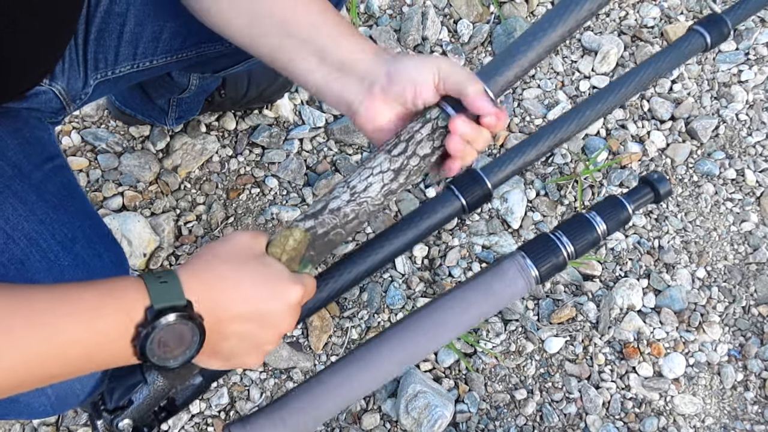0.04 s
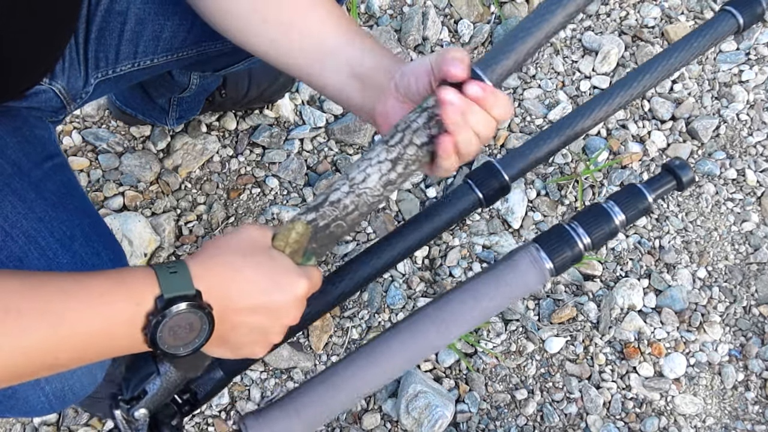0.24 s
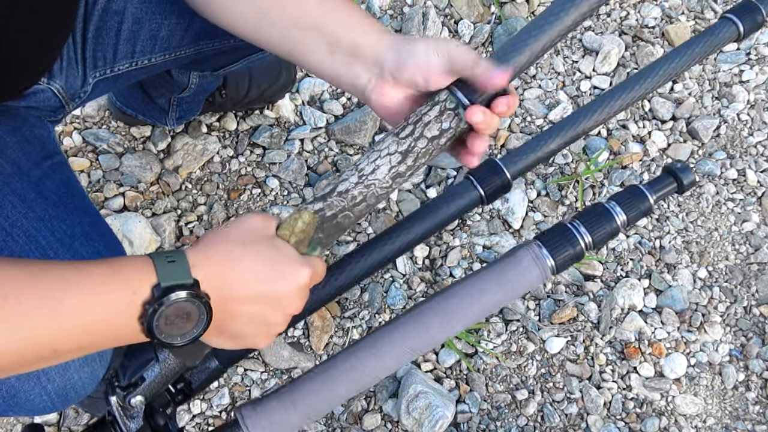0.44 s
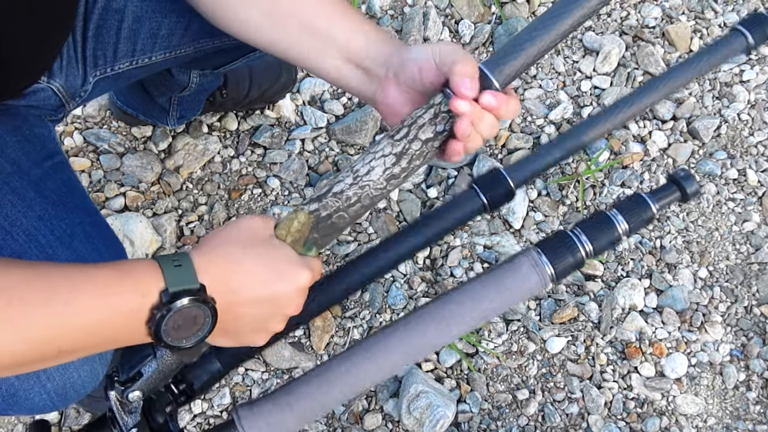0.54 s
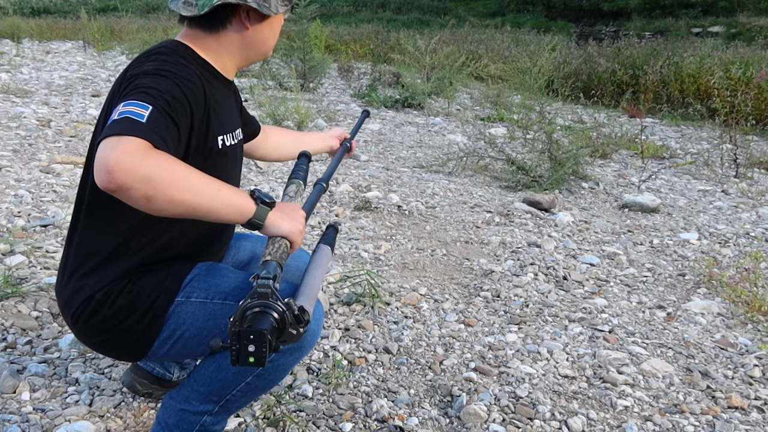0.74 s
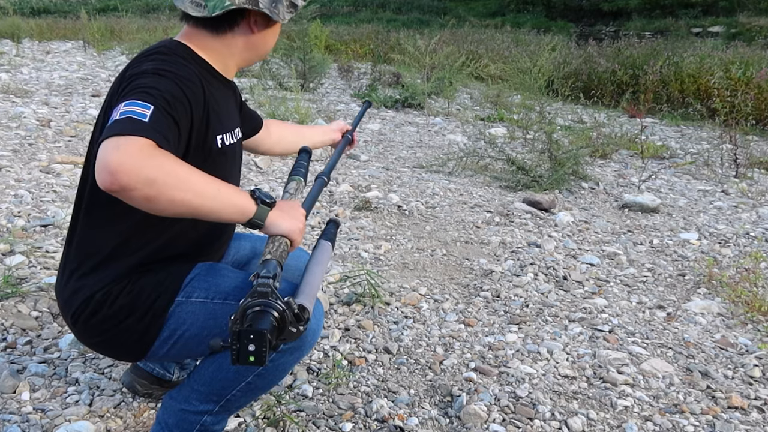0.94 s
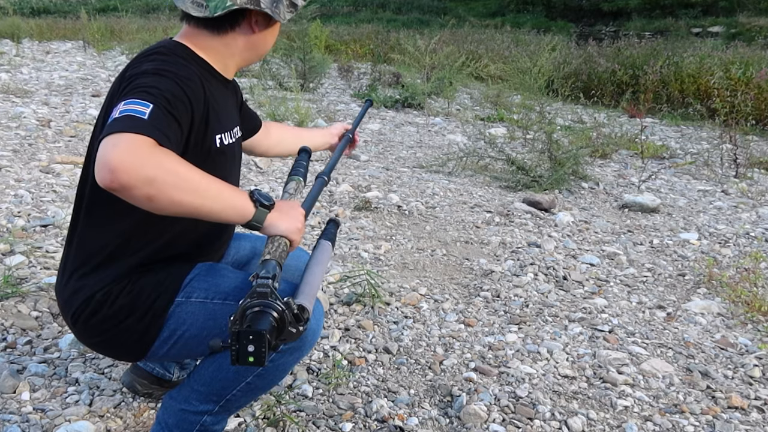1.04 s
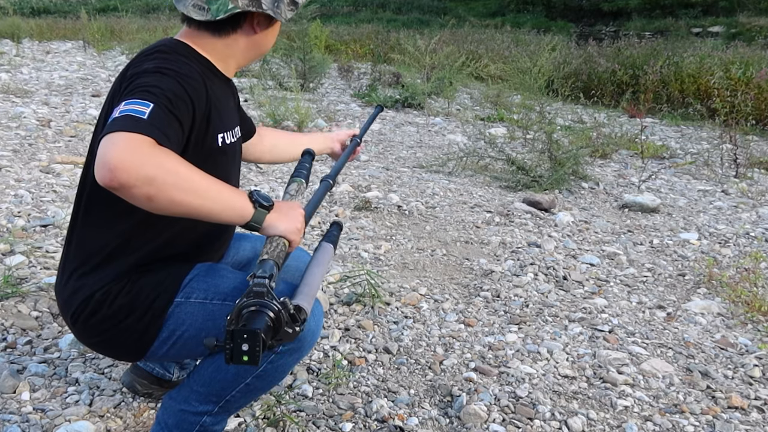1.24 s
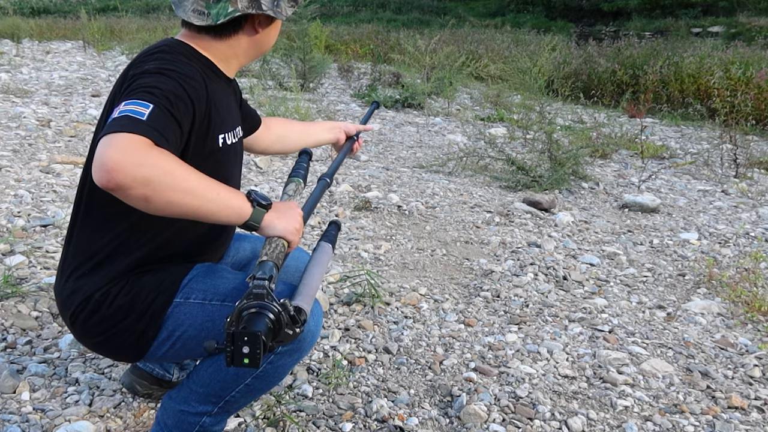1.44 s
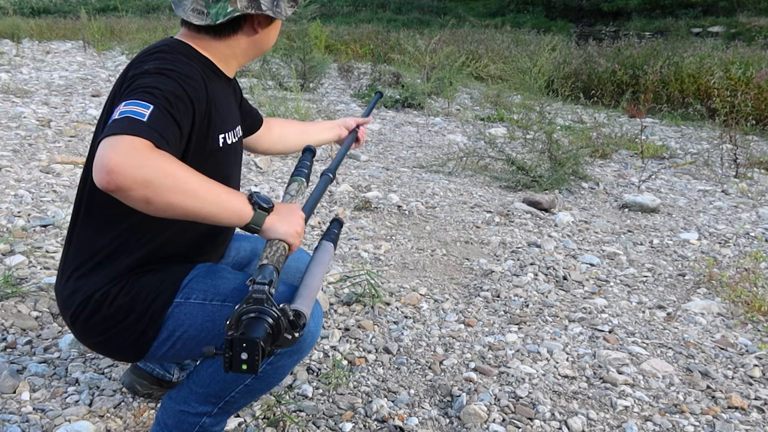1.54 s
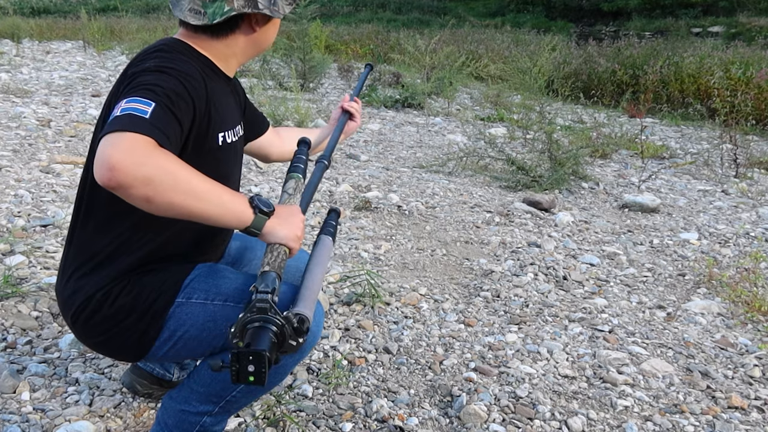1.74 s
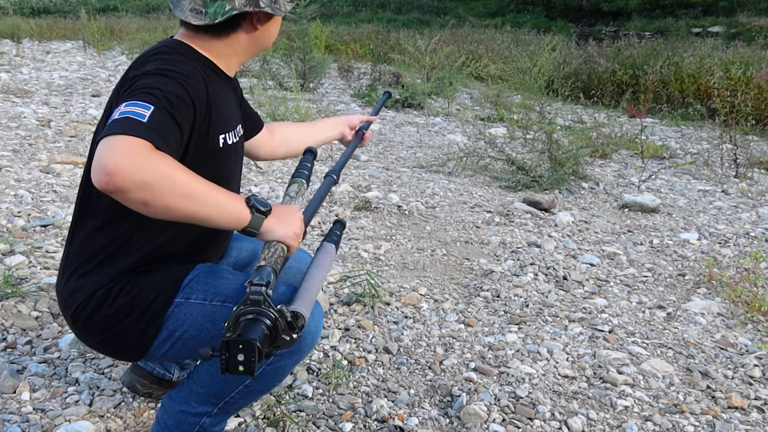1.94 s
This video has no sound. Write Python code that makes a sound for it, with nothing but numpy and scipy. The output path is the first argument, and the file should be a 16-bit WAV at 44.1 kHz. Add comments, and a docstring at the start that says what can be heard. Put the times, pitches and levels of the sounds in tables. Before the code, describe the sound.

A tripod leg slides out with a brief scrape and snaps sharply against its stop. Faint ticks, soft knocks and hand rubs follow, slightly to the left, over a quiet outdoor hush with thin insect song.

```python
"""A faint outdoor hush and thin bands of insect song lie over a stony riverbank throughout.
First a tripod's leg section slides out, friction in its collar making a growing scrape. It catches,
then snaps against its stop: the impact excites the tube's modes, and the sound scatters off the stones.
Afterwards come a few soft knocks and the rub of hands along the legs.
Small ticks from the fittings begin during the slide and recur until the end."""
import sys
import numpy as np
from scipy import signal
from scipy.fft import rfft, irfft
from scipy.io import wavfile

SR = 44100
rng = np.random.default_rng(int(sys.argv[2]) if len(sys.argv) > 2 else 0)


def to_wav(sig):
    """Store sig (one row per channel, or 1-D mono) as 16-bit WAV at the path in sys.argv[1].

    Samples outside -1..1 are clipped; the rate is SR.
    """
    pcm = np.clip(np.atleast_2d(sig), -1, 1) * 32767
    pcm = np.round(pcm).astype(np.int16)
    wavfile.write(sys.argv[1], SR, pcm.T)  # frames by channels


N = 88200
T = np.arange(N) / SR
# steep low cuts keep the snap and handling sounds thin, with little bass
LEG_LOW_CUT_HZ, HANDLING_LOW_CUT_HZ = 695, 380


def from_db(db):
    """Amplitude ratio of a level in decibels."""
    return 10 ** (np.asarray(db) / 20)


def unit_rms(x):
    """Normalisation to an rms of 1."""
    return x / np.sqrt(np.mean(x ** 2) + 1e-20)


def pan(db):
    """Interchannel level difference: two gains, the left louder by db."""
    gains = from_db(np.array([[db], [-db]]) / 2)
    return gains / gains.mean()


def low_pass(x, hz):
    """Second-order low-pass: a gentle loss of treble."""
    return signal.sosfilt(signal.butter(2, min(hz, SR / 2 - 1000), fs=SR, output="sos"), x + 1e-18)


def high_pass(x, hz):
    """Fourth-order high-pass: a steep loss of bass."""
    return signal.sosfilt(signal.butter(4, hz, "high", fs=SR, output="sos"), x + 1e-18)


def noise(spectrum, correlation):
    """Spectrally shaped stereo noise of rms 1; the mid-side balance sets the left-right correlation."""
    hz, db = np.transpose(spectrum)
    freqs = np.maximum(np.fft.rfftfreq(N, 1 / SR), 1)
    gains = from_db(np.interp(np.log(freqs), np.log(hz), db))
    mid, side = irfft(rfft(rng.standard_normal((2, N))) * gains, N)
    return unit_rms(np.sqrt(1 + correlation) * mid + np.sqrt(1 - correlation) * side * [[1], [-1]])


def narrowband(centre_hz, width_hz):
    """Quadrature modulation: slow noise shifted to a centre frequency that may move; rms 1."""
    in_phase, quadrature = low_pass(rng.standard_normal((2, N)), width_hz / 2)
    phase = 2 * np.pi * np.cumsum(centre_hz * np.ones(N)) / SR
    return unit_rms(in_phase * np.cos(phase) + quadrature * np.sin(phase))


def drift(rate_hz):
    """Random modulation of rms 1, interpolated between independent values."""
    knots = rng.standard_normal(N)
    return unit_rms(np.interp(T * rate_hz, np.arange(N), knots))


def swell(peak_s, half_length_s, level_db):
    """Bell-shaped amplitude envelope of a stroke."""
    return from_db(level_db) / (1 + ((T - peak_s) / half_length_s) ** 2 / 2) ** 2


def decay(start_s, t60_s):
    """Exponential damping: silence, then a fall from 1 by 60 dB every t60_s."""
    return (T >= start_s) * from_db(-60 * np.clip((T - start_s) / t60_s, 0, 5))


def ring(start_s, pitch_hz, t60_s):
    """Free vibration of one struck mode: a damped sinusoid."""
    return decay(start_s, t60_s) * np.sin(2 * np.pi * pitch_hz * (T - start_s))


# spectrum of the far hush: frequency_hz, density_db
HUSH_SPECTRUM = [(30, -46.5), (130, -55), (215, -45), (270, -31), (350, -33), (450, -21.5), (700, -9),
                 (900, -4), (1300, 1), (1750, -3), (2400, -4), (3500, -8.5), (4900, -8.5), (5700, -12),
                 (8600, -11), (9600, -18.5), (15700, -23), (16100, -57)]
# bands of insect song: centre_hz, width_hz, start_level_db, end_level_db
INSECT_BANDS = [(6690, 510, -79, -79.5), (8010, 1000, -77, -70.5)]


def outdoors():
    """Ambient noise: a wavering broadband hush, and insect song as noise confined by resonance."""
    out = from_db(-63 - 0.82 * drift(14)) * noise(HUSH_SPECTRUM, correlation=0.22)
    for centre_hz, width_hz, start_level_db, end_level_db in INSECT_BANDS:
        resonance = signal.iirpeak(centre_hz, centre_hz / width_hz, fs=SR)
        band = signal.lfilter(*resonance, rng.standard_normal((2, N)))
        song = unit_rms(signal.lfilter(*resonance, band))  # a second pass steepens the skirts
        level_db = np.linspace(start_level_db, end_level_db, N) + 0.81 * drift(22)
        out = out + song * from_db(level_db)
    return pan(1) * out


# envelope of the tube's friction in its collar: time_s, level_db
SLIDE_ENVELOPE = [(0.079, -69), (0.085, -58.5), (0.11, -51), (0.13, -48), (0.155, -46), (0.168, -49.5),
                  (0.185, -43), (0.203, -43), (0.21, -73)]
# spectrum of that friction: frequency_hz, density_db
SLIDE_SPECTRUM = [(300, -50), (700, -30), (1050, -12), (1900, -16.5), (2800, -3), (3200, -1.5),
                  (3750, -4.5), (4300, -6), (5300, -1.5), (6100, -5), (6900, -13), (9400, -11.5),
                  (10400, -8.5), (12100, -6.5), (12400, -18), (15600, -27), (16300, -48)]
RASP_START_HZ, RASP_SINK_HZ_PER_S = 3740, 4200
RASP_START_S, RASP_ATTACK_S, RASP_RELEASE_S = 0.076, 0.0076, 0.014


def slide():
    """Sliding friction: a growing hiss, and a rasp whose resonance sinks as the leg lengthens."""
    level_db = np.interp(T, *np.transpose(SLIDE_ENVELOPE), left=-np.inf, right=-np.inf)
    hiss = from_db(level_db) * noise(SLIDE_SPECTRUM, correlation=0.53)
    stop_s = STOP_IMPACTS[-1][0]
    attack = np.clip((T - RASP_START_S) / RASP_ATTACK_S, 0, 1)
    release = np.clip(1 + (stop_s - T) / RASP_RELEASE_S, 0, 1)
    travel_s = np.clip(T, RASP_START_S, stop_s) - RASP_START_S
    rasp_hz = RASP_START_HZ - RASP_SINK_HZ_PER_S * travel_s
    rasp = from_db(-54.5) * attack * release * narrowband(rasp_hz, width_hz=330)
    # near the stop the tube judders in its low mode
    judder = swell(peak_s=0.1762, half_length_s=0.0048, level_db=-52.5) * narrowband(1060, width_hz=68)
    roughness = from_db(0.5 * drift(500))
    return pan(4) * roughness * (hiss + rasp + judder)


# contacts of the fittings: start_s, level_db, pitch_hz, t60_s, relative_splash_db
FITTING_TICKS = [(0.126, -46.5, 1410, .016, -11), (0.2838, -56.5, 1800, .01, 4.5),
                 (0.307, -45.5, 1480, 0.011, -4.5), (1.2665, -47.5, 3720, 0.0086, -3),
                 (1.7085, -32.5, 2570, 0.0066, -9), (1.7126, -46, 2180, 0.0098, -8),
                 (1.9349, -51.5, 2760, 0.0088, -11), (1.9645, -57.5, 1030, 0.031, 7.5)]
# spectrum of a tick's noise splash: frequency_hz, density_db
SPLASH_SPECTRUM = [(150, -53), (450, 2), (1000, 5), (5000, 4.5), (10500, -7), (14000, -28)]
TICK_RISE_S, TICK_LOW_CUT_HZ = 0.0005, 426


def ticks():
    """Hard contact: each tiny impact excites one short-lived mode and a broadband splash."""
    grit = noise(SPLASH_SPECTRUM, correlation=0.6)
    out = 0
    for start_s, level_db, pitch_hz, t60_s, relative_splash_db in FITTING_TICKS:
        rise = np.clip((T - start_s) / TICK_RISE_S, 0, 1)
        splash = from_db(relative_splash_db) * decay(start_s, t60_s) * grit
        out = out + from_db(level_db) * rise * (ring(start_s, pitch_hz, t60_s) + splash)
    return high_pass(out, TICK_LOW_CUT_HZ)


# the section catches, then hits its stop: start_s, level_db, brightness_hz
STOP_IMPACTS = [(0.1792, -22, 2200), (0.2035, 1, 13000)]
# natural modes of the leg: pitch_hz, level_db, t60_s
TUBE_MODES = [(810, -29.5, 0.05), (1020.7, -25, 0.091), (1250, -26, 0.025), (1408, -20, 0.018),
              (1705, -17.5, 0.017), (1933, -26.5, 0.03), (2470, -13, 0.0079), (2966, -25, 0.03),
              (3620, -17, 0.014), (4430, -15.5, 0.0072), (4990, -17, 0.013), (5770, -19, 0.0086),
              (6500, -28, 0.011), (7435, -31.5, 0.0068), (10580, -33.5, 0.017), (11880, -28, 0.0045)]
# rattle of the parts at the stop: frequency_hz, density_db
RATTLE_SPECTRUM = [(200, -32), (550, -30.5), (1000, -18), (3500, -1.5), (5000, -4), (8000, -3),
                   (12000, -12.5), (13000, -22), (16500, -27)]
# scatter off the stones: frequency_hz, density_db
SCATTER_SPECTRUM = [(40, -24), (250, -19.5), (520, -16), (740, 5.5), (1900, 0.5), (3600, -4), (5000, -15.5),
                    (9000, -20.5), (15000, -42)]
# dull shudder of the frame: frequency_hz, density_db
SHUDDER_SPECTRUM = [(60, -17), (110, -19), (180, 1), (420, 4), (900, -25), (3000, -44)]
ECHO_DELAY_S, ECHO_CUT_HZ = 0.0054, 1920
SCATTER_T60_S, SCATTER_BUILD_S = 0.11, 0.0067
LEG_PAN_DB = 8


def snap():
    """Impact excitation: tube modes ring and parts rattle; the ground reflects and the stones scatter."""
    out = 0
    for start_s, level_db, brightness_hz in STOP_IMPACTS:
        # the modes alternate in polarity, two by two
        tube = sum(from_db(mode_db) * (-1) ** (k // 2) * ring(start_s, pitch_hz, t60_s)
                   for k, (pitch_hz, mode_db, t60_s) in enumerate(TUBE_MODES))
        ground_echo = from_db(-8.5) * low_pass(np.interp(T - ECHO_DELAY_S, T, tube), ECHO_CUT_HZ)
        rattle = from_db(-22) * decay(start_s, t60_s=0.025) * noise(RATTLE_SPECTRUM, correlation=0.69)
        scatter_envelope = decay(start_s, SCATTER_T60_S) - decay(start_s, SCATTER_BUILD_S)
        scatter = from_db(-31.5) * scatter_envelope * noise(SCATTER_SPECTRUM, correlation=0.47)
        blow = pan(LEG_PAN_DB) * (tube + ground_echo) + pan(2) * (rattle + scatter)
        thin_blow = high_pass(low_pass(blow, brightness_hz), LEG_LOW_CUT_HZ)
        # the jolted frame adds a faint low push and a shudder
        thump = pan(LEG_PAN_DB) * from_db(-75) * ring(start_s, pitch_hz=40, t60_s=0.09)
        shudder = from_db(-65) * decay(start_s, t60_s=0.09) * noise(SHUDDER_SPECTRUM, correlation=0.3)
        out = out + from_db(level_db) * (thin_blow + thump + shudder)
    return out


# soft handling blows: start_s, level_db, pitch_hz, t60_s
SOFT_KNOCKS = [(0.606, -56, 910, 0.033), (1.5489, -45.5, 892, 0.051), (1.5874, -45.5, 863, 0.021),
               (1.612, -57, 837, 0.034), (1.6295, -53, 810, 0.07)]
OVERTONE_RATIO, KNOCK_BRIGHTNESS_HZ = 1.26, 1510


def knocks():
    """Compliant contact: a padded blow carries little treble and excites a low pair of modes."""
    out = 0
    for start_s, level_db, pitch_hz, t60_s in SOFT_KNOCKS:
        overtone = from_db(-3) * ring(start_s, pitch_hz * OVERTONE_RATIO, t60_s / 2)
        out = out + from_db(level_db) * (ring(start_s, pitch_hz, t60_s) - overtone)
    return high_pass(low_pass(out, KNOCK_BRIGHTNESS_HZ), LEG_LOW_CUT_HZ)


# strokes of a hand along the leg: peak_s, half_length_s, level_db, brightness_hz
HAND_STROKES = [(0.974, 0.021, -54, 12300), (1.379, 0.0081, -63.5, 9000), (1.735, 0.015, -56, 2430)]
# friction of hand on leg: frequency_hz, density_db
RUB_SPECTRUM = [(400, -37), (1200, -10), (2100, -11.5), (2550, 0), (3800, 0), (4600, -8), (5300, -13),
                (10000, -18), (16000, -34.5)]
# thin, high swish of the shifting grip: frequency_hz, density_db
SWISH_SPECTRUM = [(1000, -14), (4000, -8), (8000, -2), (10300, -3), (12100, -2), (12600, -10.5),
                  (15500, -18), (16200, -36)]


def rubs():
    """Friction noise, amplitude-modulated: short grainy hand strokes and a swish as the grip shifts."""
    friction = pan(5.5) * noise(RUB_SPECTRUM, correlation=0.51)
    strokes = sum(swell(peak_s, half_length_s, level_db) * low_pass(friction, brightness_hz)
                  for peak_s, half_length_s, level_db, brightness_hz in HAND_STROKES)
    grip_shift = swell(peak_s=1.738, half_length_s=0.068, level_db=-64.5)
    swish = grip_shift * noise(SWISH_SPECTRUM, correlation=0.3)
    roughness = from_db(2.2 * drift(350))
    return (strokes + swish) * roughness


def scene():
    """Superposition: the tripod, a little to the left, over the ambience."""
    handling = slide() + rubs() + pan(5.5) * (ticks() + knocks())
    return snap() + high_pass(handling, HANDLING_LOW_CUT_HZ) + outdoors()


CUTOFF_HZ = 16600


def record(dry):
    """Band limiting: an elliptic low-pass cuts the highest treble steeply."""
    return signal.sosfilt(signal.ellip(10, 0.1, 80, CUTOFF_HZ, fs=SR, output="sos"), dry)


dry = scene()
out = record(dry)
to_wav(out)
```